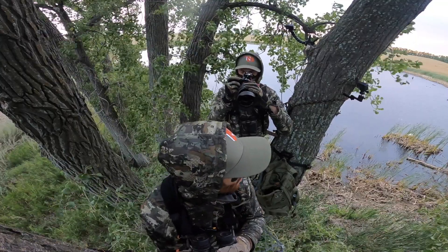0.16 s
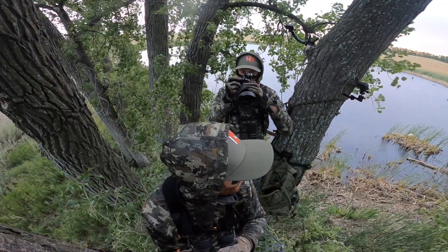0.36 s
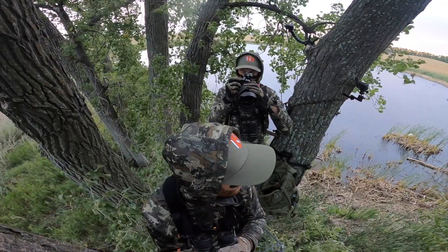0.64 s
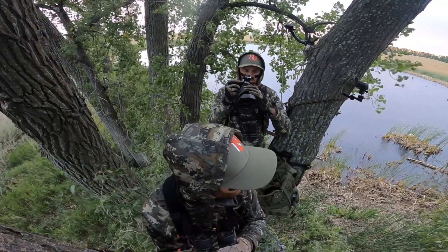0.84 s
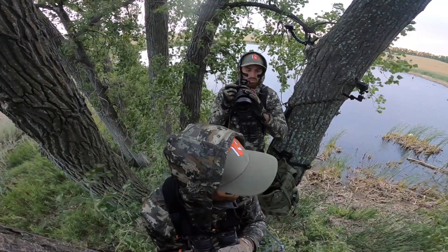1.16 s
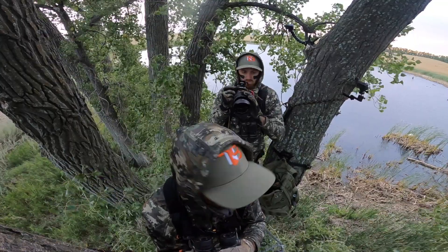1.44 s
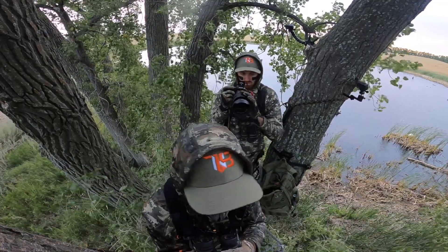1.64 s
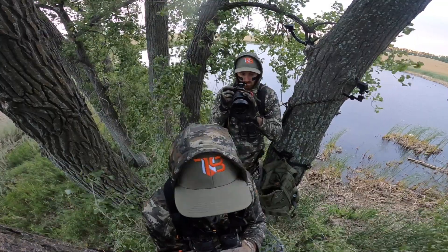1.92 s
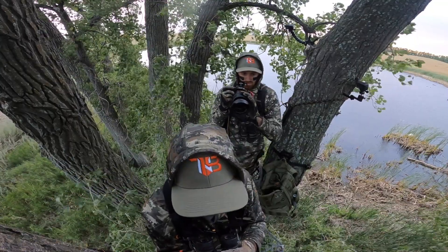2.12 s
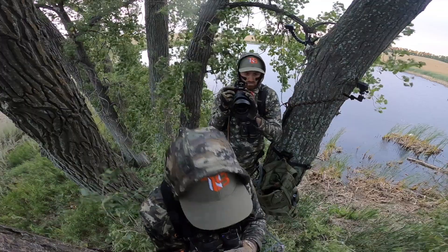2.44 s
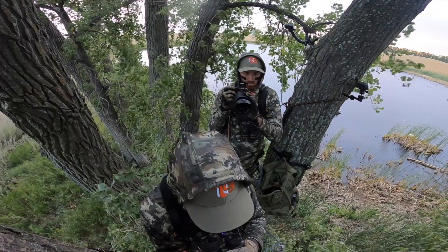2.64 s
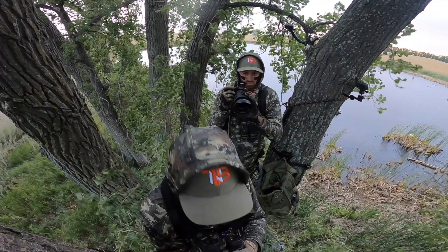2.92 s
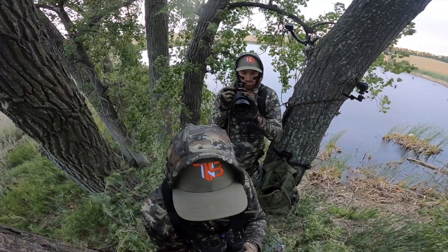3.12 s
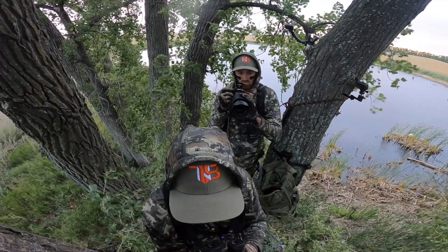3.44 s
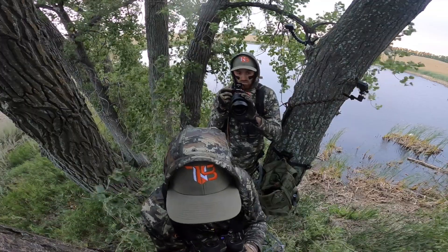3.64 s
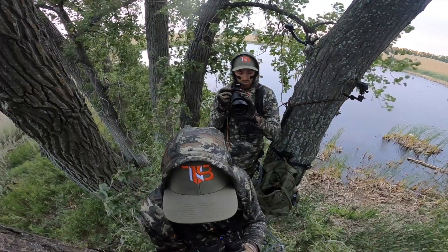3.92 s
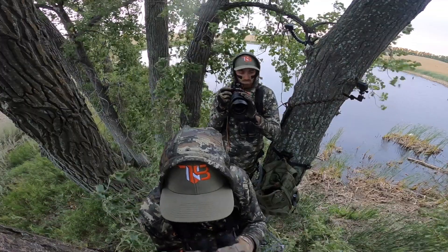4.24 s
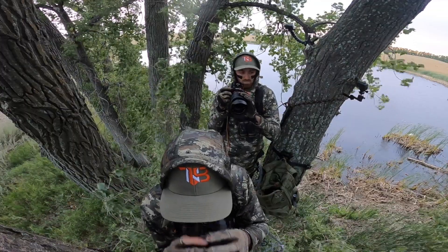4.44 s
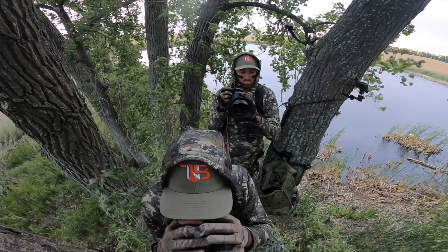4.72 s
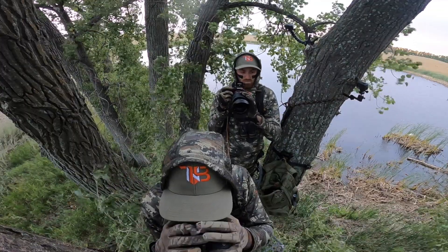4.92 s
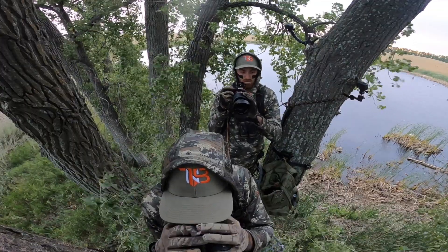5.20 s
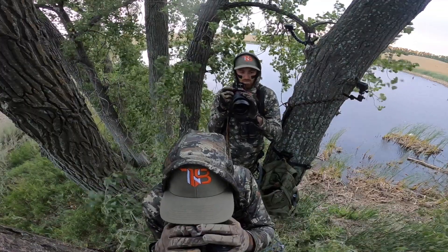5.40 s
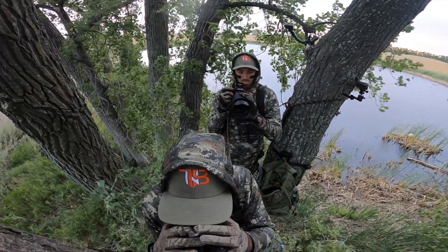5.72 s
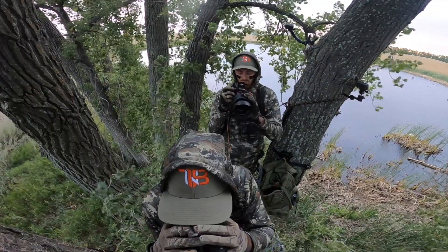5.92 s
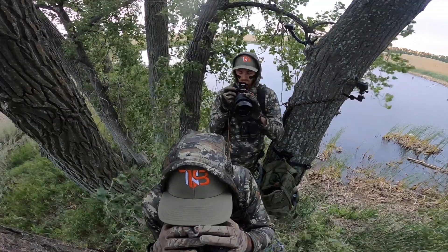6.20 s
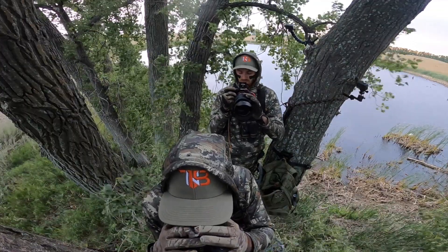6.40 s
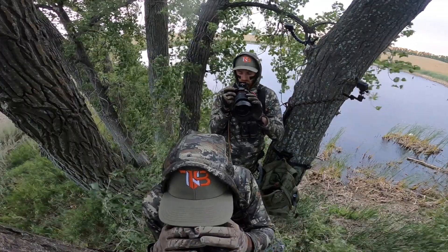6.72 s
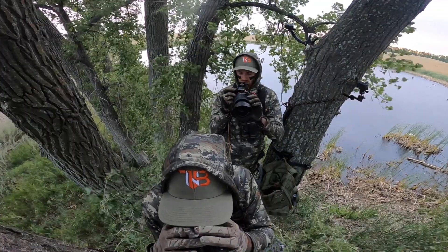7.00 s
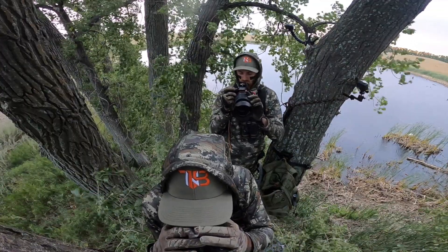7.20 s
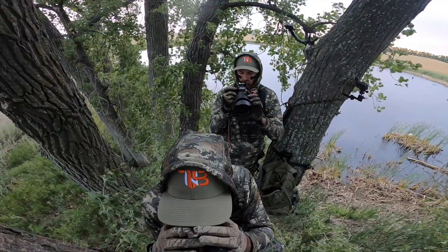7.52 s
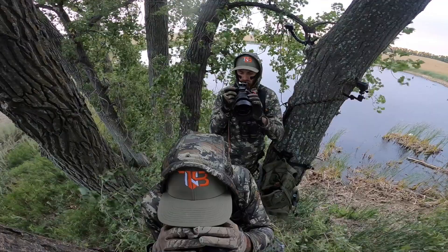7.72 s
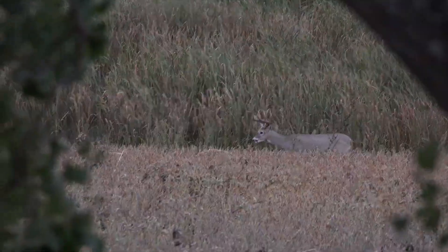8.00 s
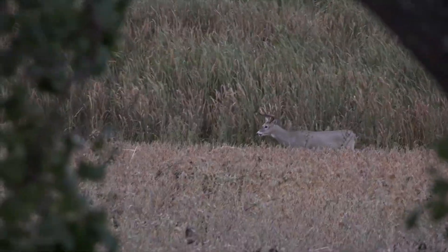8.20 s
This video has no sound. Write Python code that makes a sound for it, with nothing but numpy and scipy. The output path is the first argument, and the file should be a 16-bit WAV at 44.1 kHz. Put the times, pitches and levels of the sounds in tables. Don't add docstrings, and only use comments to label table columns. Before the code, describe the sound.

Outdoors under leafy trees near water, wind blows over a small bare microphone. In the first 0.2 seconds a burst of hard low thumps hits it, edged with quick flutters. Lighter puffs patter until about 1.4, when a firmer gust comes, with more thumps around 1.9 to 2.3. From roughly 2.7 to 3.9 it is calmer, with only isolated soft bumps. Gusts return at 4.0, then cluster at 4.6 to 4.8 and 5.1 to 5.4, with a strong knock near 5.3. Small puffs follow, another strong double thump lands near 6.4, and the heaviest, abrupt blow comes at about 6.9. Afterward the wind eases into faint bumps, with a modest push near 8.1. Throughout, a weak uneven low rumble fills gaps, while leaves hiss softly and smoothly and air roars dully around branches, nearly constant, dipping slightly near 7.0.

```python
import sys
import numpy as np
from scipy import signal
from scipy.fft import rfft, irfft, next_fast_len
from scipy.io import wavfile
from scipy.ndimage import uniform_filter1d

SR = 44100
rng = np.random.default_rng(int(sys.argv[2]) if len(sys.argv) > 2 else 0)


def master_out(mix):
    frames = np.transpose(np.atleast_2d(mix))
    ceiling = np.clip(frames, -1, 1)
    pcm = np.round(ceiling * 32767).astype(np.int16)
    wavfile.write(sys.argv[1], SR, pcm)


def magnitude_from_level(level_db):
    exponent = np.asarray(level_db, float) / 20
    return 10 ** exponent


N = 368235


def rms_one(x):
    return x / np.sqrt(np.mean(x ** 2) + 1e-20)


def level_in_time(rows):
    time, level_db = np.transpose(rows)
    return np.interp(np.arange(N) / SR, time, level_db)


def at_hz(spectrum, hz):
    points_hz, level_db = np.transpose(spectrum)
    return np.interp(np.log(hz + 1e-9), np.log(points_hz), level_db)


def drift(rate):
    every = 40
    pole = np.exp(-2 * np.pi * rate * every / SR)
    noise = rng.standard_normal(N // every + 2002)
    slow = signal.lfilter([1], [1, -2 * pole, pole ** 2], noise)[2000:]
    return np.interp(np.arange(N) / every, np.arange(len(slow)), rms_one(slow))


def patchy_noise(spectrum, shared_db, own_db, rate):
    size = next_fast_len(N)
    hz = np.arange(size // 2 + 1) * SR / size
    coloured = rfft(rng.standard_normal(size)) * magnitude_from_level(at_hz(spectrum, hz))
    together = drift(rate)
    out = 0
    spacing = 0.75
    for centre in 15 * 2 ** np.arange(0, 10.6, spacing):
        if at_hz(spectrum, centre) > -60:
            octaves_off = np.abs(np.log2(hz / centre + 1e-9))
            share = np.clip(1 - octaves_off / spacing, 0, 1)
            band = irfft(coloured * share, size)[:N]
            out = out + band * magnitude_from_level(shared_db * together + own_db * drift(rate))
    return rms_one(out)


def eddies(table, colour, stretch, evenness, snap, gain_db):
    time, peak_db, pitch_hz, length_ms = np.transpose(table)
    span = 4096
    hz = np.arange(span // 2 + 1) * SR / span
    tint = magnitude_from_level(at_hz(colour, hz / pitch_hz[:, None]))
    noise = irfft(rfft(rng.standard_normal((len(time), span))) * tint, span)
    noise = signal.hilbert(noise)

    swell = uniform_filter1d(uniform_filter1d(np.abs(noise) ** 2, size=160), size=160)
    floor = 0.044 * swell.mean(axis=1, keepdims=True)
    noise = noise / (swell + floor) ** (evenness / 2)

    core = np.roll(signal.hilbert(irfft(tint, span)), span // 2, axis=1)
    core = core / np.abs(core).max(axis=1, keepdims=True)
    turn = 3.28 * (rng.random((len(time), 1)) - 0.5)
    suction = -core * np.exp(1j * turn)
    push = noise / np.std(noise, axis=1, keepdims=True) + snap * suction

    t_ms = 1000 * (np.arange(span) - span / 2) / SR
    bell = np.exp(-2 * (t_ms / (stretch * length_ms[:, None])) ** 2)
    height = np.sqrt(np.sum(np.abs(push * bell) ** 2, axis=1) / np.sum(bell ** 2, axis=1))
    pushes = push.real * bell * (magnitude_from_level(peak_db + gain_db) / height)[:, None]

    out = np.zeros(N + 2 * span)
    starts = np.round(time * SR).astype(int) + span // 2
    for start, one_push in zip(starts, pushes):
        out[start:start + span] += one_push
    return out[span:span + N]


# (frequency [multiple of swirl pitch], level [dB per Hz])
SWIRL_COLOUR = [(.06, -48), (.2, -11.5), (.5, -3), (.9, 0), (1.4, -6), (2.2, -22), (4.0, -48), (9.0, -86),
                (25.0, -150)]
# (time [s], peak level [dB], swirl pitch [Hz], length [ms])
HARD_EDDIES = [(0.027, -14, 190, 11.5), (0.038, -9, 145, 9.9), (0.052, -20.5, 224, 21),
               (0.079, -17.5, 219, 15), (0.125, -21, 151, 13), (0.173, -15, 161, 14),
               (1.429, -17, 146, 17.6), (1.568, -17.5, 124, 22), (1.926, -16, 144, 13),
               (1.972, -31, 138, 8.1), (2.137, -18.5, 124, 30), (2.216, -16.5, 149, 24),
               (2.318, -17.5, 133, 15), (3.991, -14.5, 172, 11), (4.024, -17.5, 112, 19),
               (4.079, -20, 141, 28), (4.768, -16, 129, 26), (4.812, -15, 217, 51), (5.099, -17.5, 150, 39),
               (5.144, -12, 132, 18.4), (5.311, -13, 210, 11), (5.327, -9, 177, 10),
               (5.395, -18.5, 129, 42), (6.361, -7, 169, 13.4), (6.38, -11.5, 114, 29),
               (6.535, -20.5, 117, 13), (6.852, -12, 252, 4.9), (6.863, -2.5, 157, 9.8),
               (6.905, -11, 137, 26.3), (8.11, -19, 171, 22)]


def hard_thumps():
    return eddies(HARD_EDDIES, SWIRL_COLOUR, stretch=1.0, evenness=1.0, snap=2.02, gain_db=-0.75)


# (start time [s], length [s], peak level [dB], swirl pitch [Hz])
WIND_PUFFS = [(0.085, .09, -19.5, 149), (0.2, 0.1, -35.5, 108), (0.52, 0.064, -23, 144),
              (0.82, 0.047, -26.5, 145), (0.955, 0.036, -27, 119), (1.03, 0.097, -38, 108),
              (1.175, .075, -30, 180), (1.27, 0.054, -29.5, 148), (1.46, .09, -24.5, 134),
              (1.78, .11, -28, 109), (1.94, 0.083, -24, 131), (2.11, .16, -29, 168),
              (2.285, .11, -25.5, 146), (2.435, 0.067, -23, 175), (2.6, 0.17, -31, 99),
              (3.9, 0.2, -29, 108), (4.39, 0.21, -34, 99), (4.575, 0.11, -21.5, 150),
              (4.775, .095, -20, 160), (4.92, .14, -36, 117), (5.47, 0.16, -28.5, 132),
              (5.62, 0.11, -27.5, 157), (5.77, 0.24, -28.5, 109), (6.11, 0.12, -31.5, 113),
              (6.4, 0.066, -25.5, 148), (6.67, 0.14, -37.5, 107), (7.08, 0.076, -29, 105),
              (7.49, .13, -30, 120), (7.94, 0.077, -34, 120), (8.135, 0.1, -29, 131)]


def puff_streets():
    count = 4
    start, length, peak_db, pitch_hz = np.transpose(WIND_PUFFS)[:, :, None]
    chance = rng.standard_normal((3, len(WIND_PUFFS), count))
    gap = length / count
    time = start + gap * (np.arange(count) + 0.5 + 0.1437 * chance[0])
    arc_db = -2 * np.linspace(-1, 1, count) ** 2
    level_db = peak_db + 3.5 * chance[1] + arc_db
    hz = pitch_hz * 2 ** (0.15 * chance[2])
    length_ms = 1000 * 0.94 * gap + 0 * time
    rows = np.transpose([column.ravel() for column in (time, level_db, hz, length_ms)])
    return eddies(rows, SWIRL_COLOUR, stretch=0.9, evenness=0.94, snap=2.0, gain_db=-0.02)


# (time [s], peak level [dB], swirl pitch [Hz], length [ms])
FAST_FLICKS = [(0.037, -24, 401, 11), (0.05, -15, 470, 9.4), (0.078, -22.5, 394, 12),
               (0.124, -21.5, 410, 12), (0.148, -26, 387, 13), (1.425, -28, 450, 15), (1.973, -33, 425, 10),
               (2.008, -38, 469, 8), (2.173, -32, 392, 11), (2.217, -24, 420, 4.5), (3.999, -31, 380, 12),
               (4.021, -22, 400, 13), (4.065, -29.5, 397, 11), (4.606, -25.5, 366, 17),
               (4.64, -30.5, 406, 19), (4.765, -25, 391, 8), (4.796, -20, 410, 24), (4.811, -18, 433, 20),
               (4.84, -28, 377, 9.1), (5.131, -30, 392, 25), (5.328, -23, 540, 7.4), (5.375, -34, 484, 9),
               (5.642, -33.5, 410, 36), (6.365, -19.5, 447, 14), (6.393, -20.5, 421, 9.4),
               (6.86, -20, 395, 6.9)]
# (frequency [multiple of swirl pitch], level [dB per Hz])
FLICK_COLOUR = [(.3, -11), (.7, 8.5), (1.0, -0.5), (1.6, -16), (2.3, -38), (3.5, -65), (9.0, -130)]


def flicks():
    return eddies(FAST_FLICKS, FLICK_COLOUR, stretch=0.63, evenness=1.0, snap=2.9, gain_db=0.8)


def flick_tips():
    tip_hz = 640
    tips = [(time, -37 + 2.15 * (db + 20.5), tip_hz, 0.67 * ms) for time, db, _, ms in FAST_FLICKS]
    return eddies(tips, SWIRL_COLOUR, stretch=0.66, evenness=0.48, snap=1.9, gain_db=-8.0)


# (time [s], peak level [dB], swirl pitch [Hz])
LONE_EDDIES = [(0.014, -41, 110), (0.461, -37, 95), (1.627, -38.5, 111), (2.556, -37, 95),
               (2.855, -34, 100), (2.983, -38, 71.5), (3.125, -31.5, 98), (3.201, -40.5, 95),
               (3.255, -35, 107), (3.431, -28, 136), (3.562, -35, 119), (3.72, -27, 116), (3.87, -45, 95),
               (4.195, -29.5, 115), (5.189, -29.5, 103), (5.237, -31, 102), (6.072, -37, 71),
               (6.946, -22.5, 94), (7.204, -42, 130), (7.343, -40, 108), (7.436, -41, 120), (7.71, -39, 85),
               (7.897, -35.5, 100), (8.316, -30, 102)]


def lone_eddies():
    length_ms = 26.3
    rows = [(time, db, hz, length_ms) for time, db, hz in LONE_EDDIES]
    return eddies(rows, SWIRL_COLOUR, stretch=1.0, evenness=1.0, snap=2.02, gain_db=-0.75)


def buffeting():
    return hard_thumps() + puff_streets() + flicks() + flick_tips() + lone_eddies()


# (time [s], level [dB])
AIR_FLOW = [(0.0, -27), (0.25, -40.5), (0.7, -46.5), (1.42, -38.5), (1.7, -44.5), (2.1, -39), (2.5, -41),
            (3.32, -54), (4.03, -36), (4.35, -52), (4.75, -35.5), (5.79, -37.5), (6.16, -44), (6.72, -47),
            (6.91, -32.5), (7.25, -49), (7.93, -49), (8.35, -43)]
# (frequency [Hz], level [dB per Hz])
RUMBLE_COLOUR = [(12, -47), (25, -18), (60, 6.5), (100, 10), (170, -2), (300, -8.5), (600, -62)]
# (frequency [Hz], level [dB per Hz])
SWAY_COLOUR = [(10, -22), (25, -6), (50, 3.5), (100, 2), (200, -23), (400, -66)]
# (time [s], depth [dB], length [s])
STILL_MOMENTS = [
    (0.694, -9, 0.046),
    (1.72, -10.5, 0.026),
    (2.07, -4, 0.026),
    (7.29, -2.5, 0.045),
    (7.81, -6.5, 0.072),
]


def rumble():
    lumps = patchy_noise(RUMBLE_COLOUR, shared_db=1.5, own_db=1.5, rate=13.4)
    lumps = magnitude_from_level(level_in_time(AIR_FLOW) - 2.0) * lumps
    sway = magnitude_from_level(-50) * patchy_noise(SWAY_COLOUR, shared_db=-2.0, own_db=0.5, rate=5.0)
    t = np.arange(N) / SR
    calm_db = np.zeros(N)
    for time, depth_db, length in STILL_MOMENTS:
        calm_db += depth_db * np.exp(-((t - time) / length) ** 2)
    return magnitude_from_level(calm_db) * (lumps + sway)


# (time [s], level [dB])
BREEZE = [(0.0, -54), (2.8, -53), (3.0, -53.5), (3.3, -53.5), (3.7, -52.5), (4.2, -52.5), (4.77, -52.5),
          (6.81, -54), (7.0, -56), (7.23, -54.5), (8.35, -54)]
# (frequency [Hz], level [dB per Hz])
LEAF_COLOUR = [(1060, -43), (1800, -21), (3030, 0), (4150, -0.5), (7150, -9.5), (10900, -21.5),
               (14200, -68), (22000, -120)]


def leaf_hiss():
    hiss = patchy_noise(LEAF_COLOUR, shared_db=0.26, own_db=0.64, rate=21.0)
    return magnitude_from_level(level_in_time(BREEZE) + 0.05) * hiss


# (frequency [Hz], level [dB per Hz])
BRANCH_COLOUR = [(110, -39), (180, -4), (529, -5.5), (764, -11.5), (1750, -20), (2200, -20.5),
                 (2860, -19.5), (4840, -120)]


def branch_roar():
    breeze_db = level_in_time(BREEZE)
    roar_db = -48 + breeze_db - breeze_db.mean()
    return magnitude_from_level(roar_db) * patchy_noise(BRANCH_COLOUR, shared_db=-0.74, own_db=0.38, rate=2.7)


def scene():
    return (buffeting() + rumble() + leaf_hiss() + branch_roar())[None, :]


def band_limit(x):
    return signal.sosfilt(signal.butter(12, 11050, fs=SR, output="sos"), x)


def record(dry):
    low_cut_hz = 44
    low_cut = signal.butter(2, low_cut_hz, "high", fs=SR, output="sos")
    thinned = signal.sosfilt(low_cut, dry)
    return band_limit(thinned)


dry = scene()
out = record(dry)
master_out(out)
```